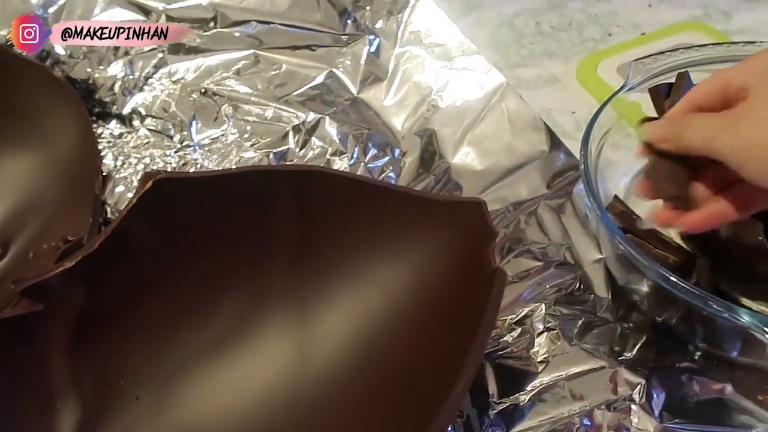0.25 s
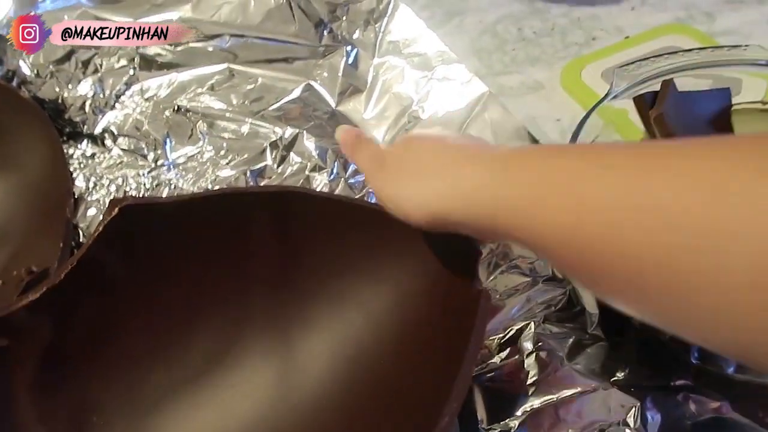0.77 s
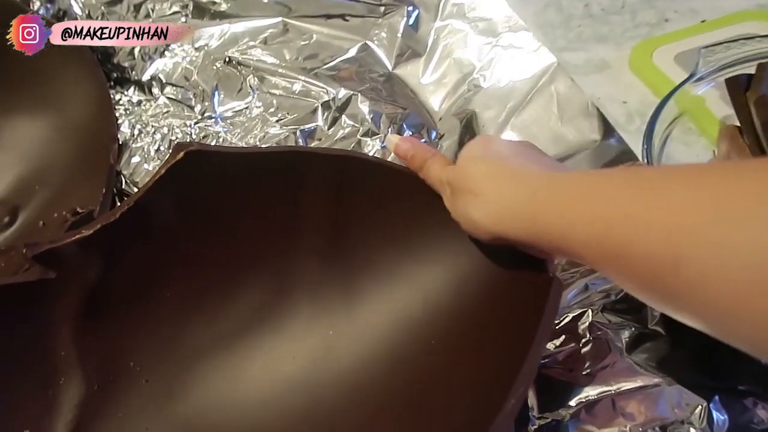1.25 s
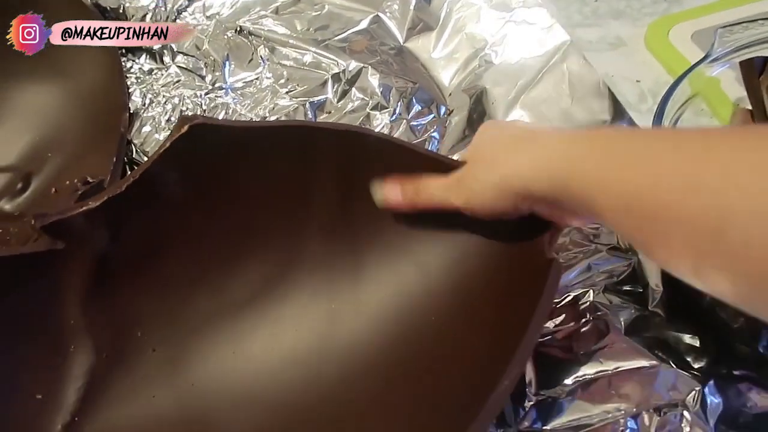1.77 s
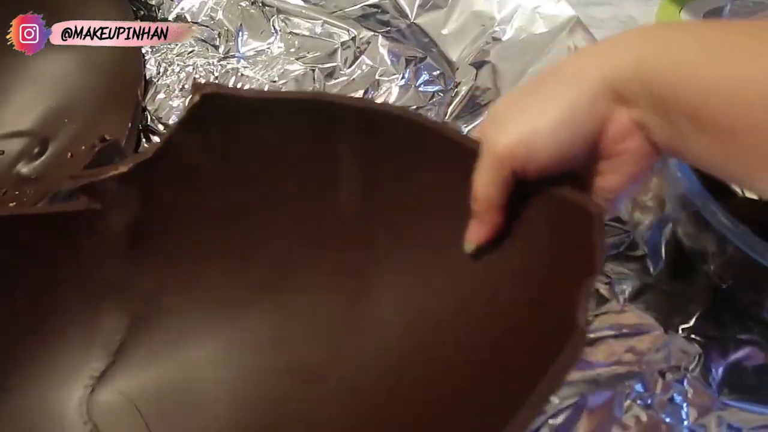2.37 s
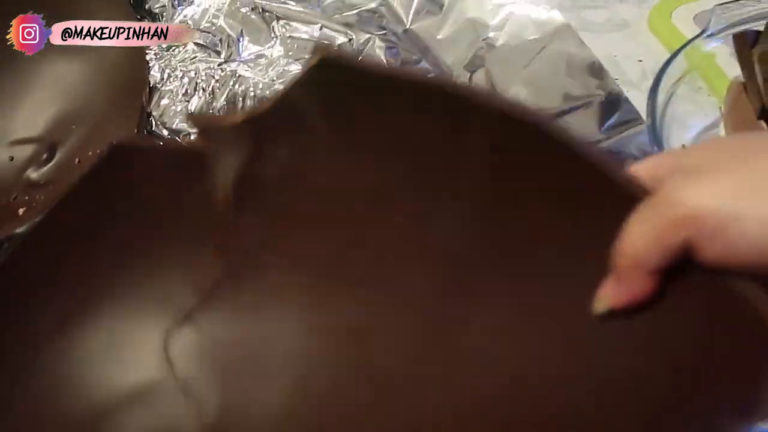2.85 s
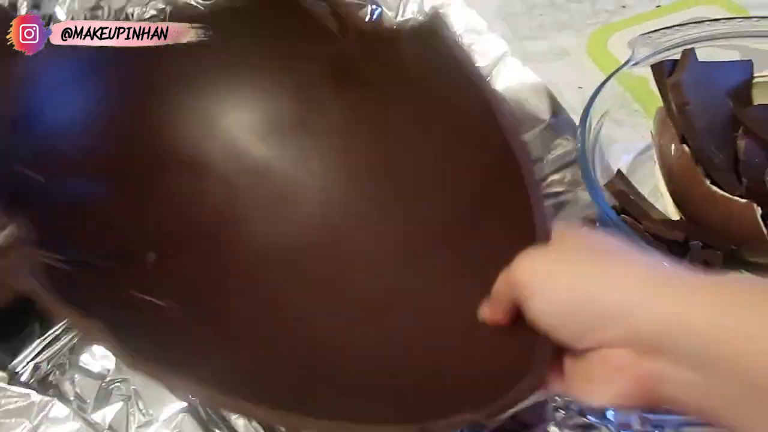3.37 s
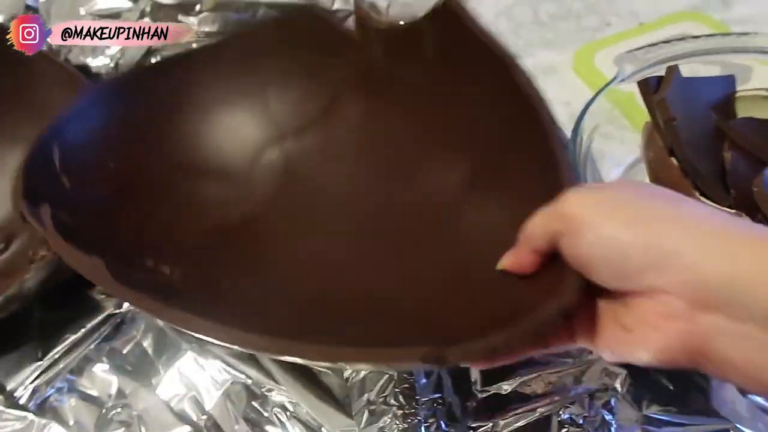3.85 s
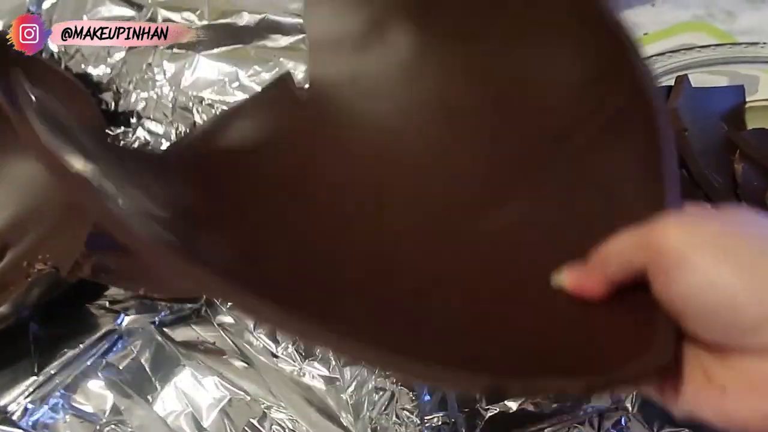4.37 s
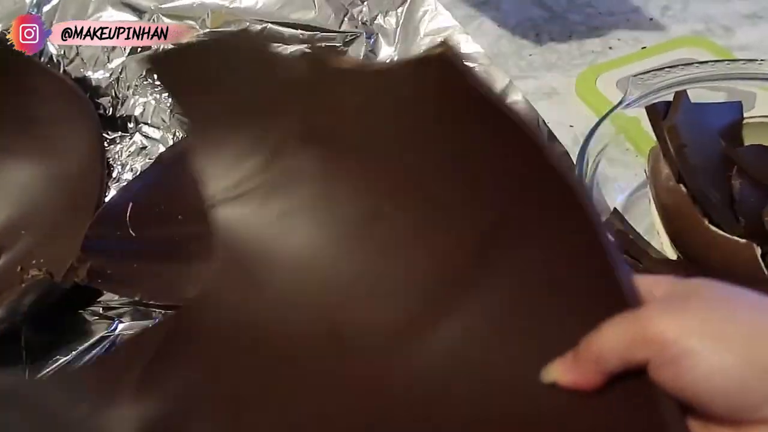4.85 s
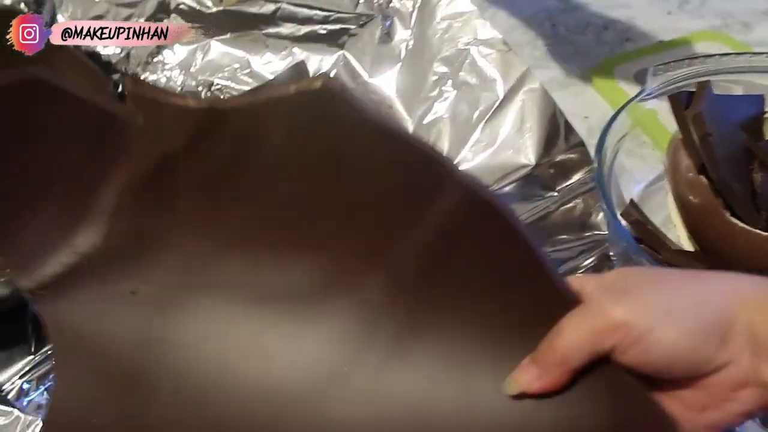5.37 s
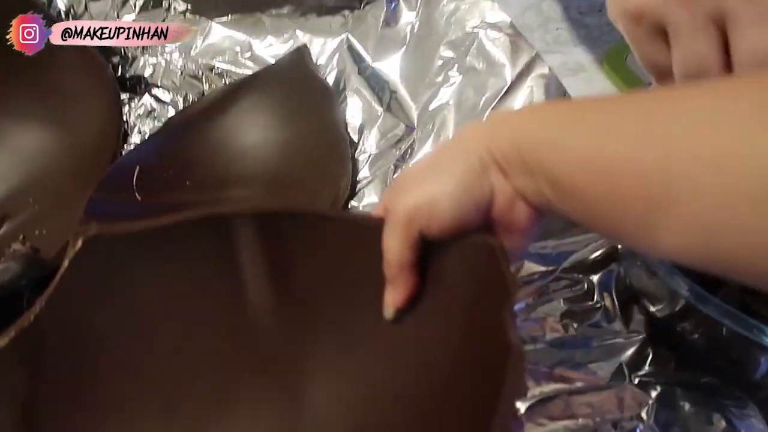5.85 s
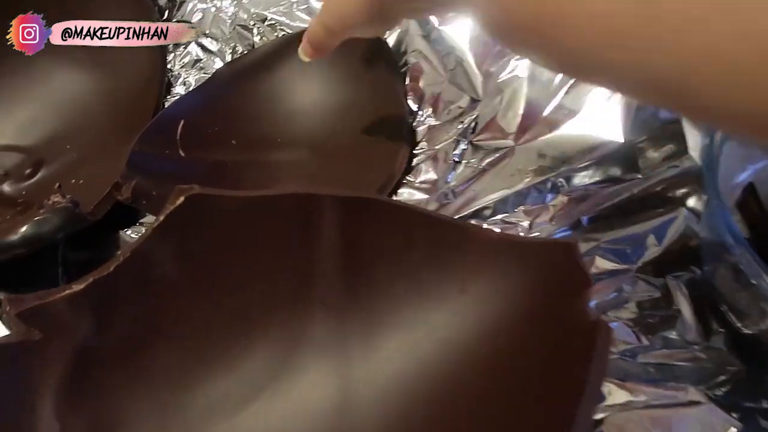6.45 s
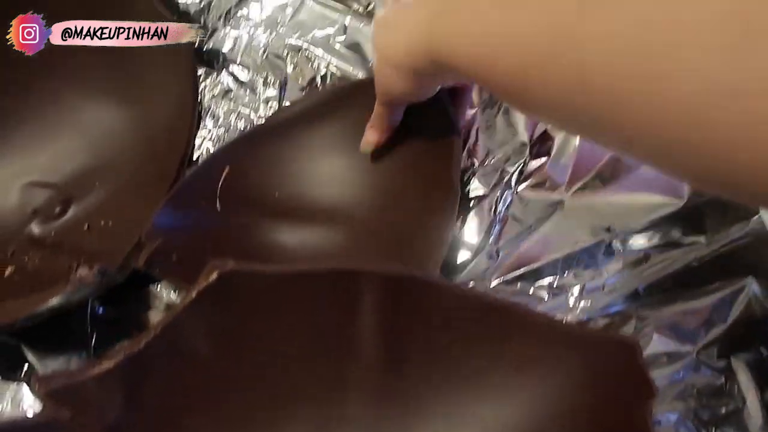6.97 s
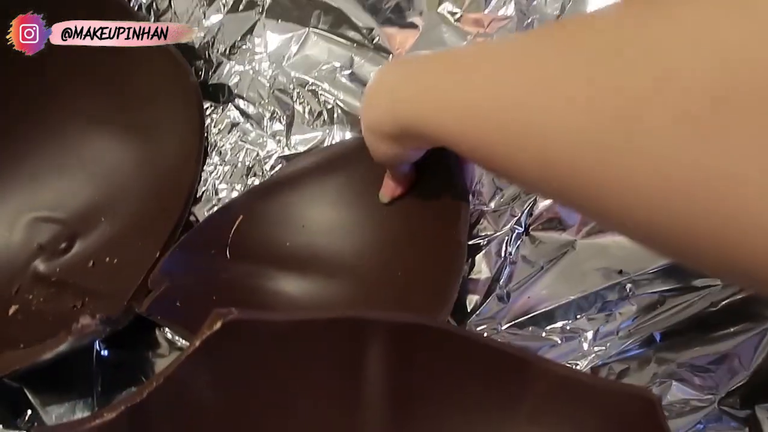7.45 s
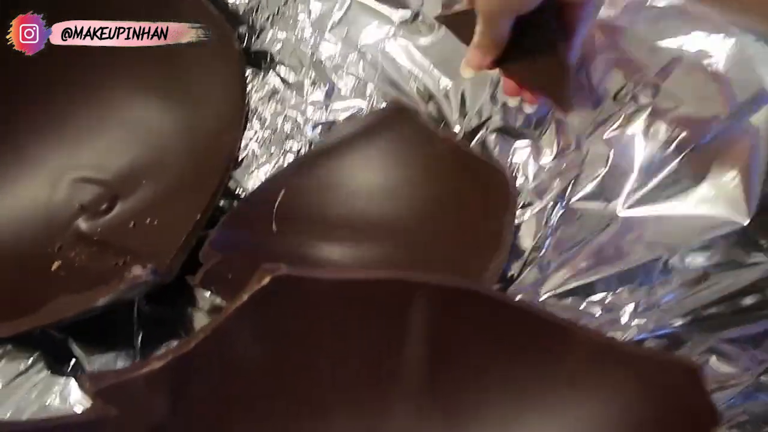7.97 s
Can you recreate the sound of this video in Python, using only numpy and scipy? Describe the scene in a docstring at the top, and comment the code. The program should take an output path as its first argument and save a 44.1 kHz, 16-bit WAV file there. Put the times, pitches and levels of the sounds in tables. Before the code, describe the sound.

Close stereo indoors, with soft low air noise and a faint wavering fan hum throughout. It starts almost quiet, with small ticks and a dull tap at 0.3 seconds and a faint glassy clink at 0.55. Foil begins crinkling around 1.0, a dry crack comes at 1.26 and a very sharp snap at 1.6. From 2.0 to 2.9 foil pops, shell creaks and cracks crowd together over low, lumpy air bumps as the shell is lifted. After a lull, two heavy hollow thuds with snaps land at about 3.5. Quiet rustling leads to a bright hard crack at 4.3, then calmer crinkling. At 5.8 a knock and loud foil burst set the shell down; small pops scatter through 6.0 to 6.8. A loose piece rocks and rustles from 7.0 to 7.5, then a strong crackling burst with a snap and knock at 7.75 fades into light crinkles.

```python
"""Crumpled foil crackles in thousands of tiny creases as hands move a large chocolate shell over it on a table.
The shell creaks as it is rubbed and cracks in short bursts; dull knocks and low air bumps are short swelling sines.
A glass dish is touched and rings as decaying sines, and lifting the shell pushes lumpy low noise at the microphone.
Behind lie a feedback-delay room, coloured air noise and the wavering sines of a fan.
Two microphone ports a finger apart listen from close by."""
import sys
import numpy as np
from scipy import signal
from scipy.fft import rfft, irfft, next_fast_len
from scipy.io import wavfile
from scipy.ndimage import uniform_filter1d, map_coordinates

SR = 44100
rng = np.random.default_rng(int(sys.argv[2]) if len(sys.argv) > 2 else 0)


def store_pcm(level_fs):
    """Save levels as 16-bit WAV."""
    pcm = np.round(np.clip(level_fs, -1, 1) * 32767).astype(np.int16)
    wavfile.write(sys.argv[1], SR, np.atleast_2d(pcm).T)


N = 361619
SECONDS = np.arange(N) / SR
SIDE = np.array([[1], [-1]])   # left port, right port


def from_db(db):
    """Decibels to gain."""
    return 10 ** (np.asarray(db) / 20)


def rms_one(x):
    """Scales to rms 1."""
    return x / np.sqrt(np.mean(x ** 2) + 1e-20)


def at_hz(points, hz):
    """Reads a spectrum on a log-frequency axis."""
    points = np.array(points)
    return np.interp(np.log(hz), np.log(points[:, 0]), points[:, 1])


def drift(rate_hz):
    """Slow chance wandering of rms 1: noise through a double low-pass, drawn at every 20th sample."""
    r = np.exp(-40 * np.pi * rate_hz / SR)
    noise = rng.standard_normal(N // 20 + 4002)
    slow = signal.lfilter([1], [1, -2 * r, r * r], noise)[4000:]   # skip the filter's start
    return np.interp(np.arange(N) / 20, np.arange(len(slow)), rms_one(slow))


def ring(x, hz, t60):
    """A resonance: a unit click starts a sine of height 1 that falls 60 dB in t60 seconds."""
    r, w = from_db(-60 / (t60 * SR)), 2 * np.pi * hz / SR
    return signal.lfilter([0, np.sin(w)], [1, -2 * r * np.cos(w), r * r], x + 1e-18)


def colour(x, spectrum):
    """Filters each row of x by a spectrum in dB."""
    size = next_fast_len(N)
    hz = np.maximum(np.arange(size // 2 + 1) * SR / size, 1)
    return irfft(rfft(x, size) * from_db(at_hz(spectrum, hz)), size)[..., :N]


def passed(x, order, hz, kind):
    """Butterworth filter along time."""
    return signal.sosfilt(signal.butter(order, hz, kind, fs=SR, output="sos"), x)


def two_ports(x, lag_us):
    """A place on the table reaches the left port lag_us later than the right."""
    half = lag_us * SR / 10 ** 6 / 2   # samples
    return np.array([map_coordinates(x, [np.arange(N) - way * half], order=5, mode="nearest")
                     for way in (1, -1)])


# Each move of the hands over the table swells to a peak and dies away. Each row: peak in seconds,
# foil crackle in dB, shell rubbing in dB before a 1 dB cut, swell and fade in seconds per 20 dB.
HAND_MOVES = [(0.0, -51.5, -59, .1, 0.2), (0.355, -58, -49, 0.13, 0.25), (0.563, -68, -38, 0.023, 0.15),
              (1.088, -45, -60, 0.11, 0.16), (1.269, -42, -36, 0.087, 0.17), (1.58, -37.5, -39, 0.52, 0.64),
              (1.618, -32, -32, 0.033, 0.084), (1.856, -45.5, -43, 0.74, 0.19),
              (2.094, -39.5, -35.5, 0.017, 0.4), (2.18, -38, -36.5, 0.25, 0.25),
              (2.38, -42.5, -42.5, 0.016, 0.65), (2.559, -37, -32.5, 0.052, 0.047),
              (2.646, -32, -27, 0.11, 0.61), (2.82, -40, -36, 0.088, 0.27),
              (2.912, -38.5, -36.5, 0.22, 0.33), (3.437, -37, -29.5, 0.0031, 0.59),
              (3.509, -25.5, -18.5, 0.058, 0.14), (3.66, -40.5, -35, 0.25, 0.81),
              (3.949, -37.5, -39.5, 0.4, 0.28), (4.22, -51, -47, 1, 0.024),
              (4.264, -34.5, -28, 0.012, 0.21), (4.296, -25.5, -21, 0.041, 0.15),
              (4.43, -39, -34.5, 0.22, 0.62), (4.995, -49, -47, 0.14, 0.3), (5.214, -41, -40, 0.089, 1),
              (5.458, -42, -58, 0.037, 0.11), (5.662, -41.5, -74, 0.02, 0.078),
              (5.775, -50, -27.5, 0.015, 0.47), (5.889, -27.5, -24, 0.14, 0.14),
              (6.263, -32.5, -33.5, 0.61, 0.22), (6.707, -37, -29.5, 0.016, 0.095),
              (6.754, -36.5, -29.5, 0.062, 0.2), (6.968, -40, -38.5, 0.24, 0.27),
              (7.019, -39.5, -37, 0.095, 0.42), (7.16, -40.5, -37, 0.017, 0.35),
              (7.449, -41.5, -43.5, 0.72, 1), (7.735, -29.5, -30.5, 0.024, 0.17),
              (7.779, -25, -24.5, 0.057, 0.15), (7.97, -32.5, -30.5, 0.24, 0.28),
              (8.1, -38, -40, 0.025, 0.19)]


def handling(column, rest_db):
    """Level in dB of one column of the moves: each runs evenly in dB, powers add to the rest level."""
    t, power = np.arange(0, N + 40, 40) / SR, from_db(2 * rest_db)
    for s, *levels_db, swell_s, fade_s in HAND_MOVES:
        loss_db = 20 * np.where(t < s, (s - t) / swell_s, (t - s) / fade_s)
        power = power + from_db(2 * (levels_db[column] - np.minimum(loss_db, 100)))
    return np.interp(SECONDS, t, 10 * np.log10(power))


def busy(level_db):
    """0 while things lie still, 1 while they are handled."""
    return np.clip((level_db + 58.5) / 11.0, 0, 1)


# Slow change of the foil's treble. Each row: time in seconds, added treble in dB.
TREBLE_DRIFT = [(0, 12), (1.6, -2.5), (2.3, 5.5), (2.9, -0.5), (3.8, 1), (4.5, 3), (5.3, -1.5), (6.2, -4.5),
                (6.75, 8), (7.2, 4), (7.5, -2), (8.2, 2)]
BRIGHT_DB, BRIGHT_FOLLOWS, BRIGHT_MAX_DB = 3, 0.71, 8.5   # at -43.5 dB crackle, dB per dB, limit


def foil_brightness(level_db):
    """The foil's treble in dB rises with the crackle up to a limit, then the slow change is added."""
    following = np.minimum(BRIGHT_DB + BRIGHT_FOLLOWS * (level_db + 43.5), BRIGHT_MAX_DB)
    return following + np.interp(SECONDS, *np.transpose(TREBLE_DRIFT))


HISS_SHARE = 0.6   # power of the fine hiss for each click per second
CLUMPS_PER_S, CLUMP_FADE_S, CLUMP_DB = 38, 0.011, 12   # most clumps, decay by e, gain of the strongest kick


def grains(per_s, spread_db, folding, count):
    """Random uneven clicks over a fine hiss, in clumps that start at once and fade, dealt to count places."""
    sizes = from_db(spread_db * np.minimum(rng.exponential(1, N), 3.1)) * rng.choice([-1, 1], N)
    sizes = sizes / np.sqrt(uniform_filter1d(sizes ** 2, size=2000))
    born = rng.random(N) < per_s / SR
    dealt = rng.integers(0, count, N) == np.arange(count)[:, None]
    hiss = rng.standard_normal((count, N)) * np.sqrt(HISS_SHARE * per_s / SR / count)
    # a fold gives way and a flurry of creases dies down after it; neighbouring places share it
    chance = folding * 2 * CLUMPS_PER_S / (count + 1) / SR
    folds = rng.random((count // 2 + 1, N)) < chance
    kicks = folds * from_db(CLUMP_DB) * rng.uniform(0.67, 1.0, N)
    clumps = 1 + signal.lfilter([1], [1, -np.exp(-1 / (CLUMP_FADE_S * SR))], kicks + 1e-18)
    return clumps[np.arange(count) // 2] * (sizes * born * dealt + hiss)


# Tone of the crumpled foil close by. Each row: frequency in Hz, relative level in dB.
FOIL_TONE = [(290, -64), (500, -6), (748, -13), (1140, -6.5), (1470, -6.5), (2110, -6.5), (2810, -9.5),
             (6560, -14.5), (12200, -16.5), (15600, -26)]
CREASES_PER_S, CREASE_SPREAD_DB = 1100, 4.5   # at -40 dB crackle; widest spread, when handled
SETTLE_DB_PER_S = 92   # foil let go this fast only whispers, without loud creases


def foil(level_db, bright_db):
    """Creases flip by the thousand, denser under a heavy hand, and ring a few cycles; gives four patches."""
    per_s = CREASES_PER_S * np.clip(from_db(0.66 * (level_db + 40)), .7, 6)
    stirred = np.clip(1 + np.gradient(level_db) * SR / SETTLE_DB_PER_S, 0, 1)
    active = stirred * busy(level_db)
    folding = active * np.clip((-26 - level_db) / 12.0, 0, 1)   # loud crackle is less clumped
    creases = grains(per_s, active * CREASE_SPREAD_DB, folding, count=16)
    creases = creases / np.sqrt(per_s / CREASES_PER_S)
    pitches_hz = np.geomspace(900, 12000, 16)[7 * np.arange(16) % 16]   # shuffled over the places
    for k, hz in enumerate(pitches_hz):
        ringing = rms_one(ring(creases[k], hz, 12.7 / hz)) * creases[k].std()
        creases[k] = 0.42 * creases[k] + ringing * (hz / 4000) ** 0.11
    patches = colour(creases.reshape(4, 4, N).sum(0), FOIL_TONE)
    patches /= np.sqrt(np.mean(patches.sum(0) ** 2))
    low = passed(patches, 1, 5000, "low")
    return from_db(level_db) * (low + from_db(bright_db) * (patches - low))


# Resonances of the chocolate shell. Each row: frequency in Hz, broadness in Hz (60 dB decay in
# 1.416 / broadness seconds), level in dB.
SHELL_MODES = [(409, 418, 4.5), (566.5, 104, 0.5), (658, 205, 1.5), (810, 140, 0), (937, 840, 1.5)]


def shell(x):
    """Broad, heavily damped resonances of the chocolate shell, which is too small to radiate bass."""
    rings = sum((-1) ** k * from_db(db) * ring(x, hz, 1.416 / width)
                for k, (hz, width, db) in enumerate(SHELL_MODES))
    return passed(rings, 2, 300, "high")


def rubbing(level_db):
    """Fingers and foil drag over the shell: dense grains excite its resonances and it creaks."""
    return from_db(level_db - 1.0) * rms_one(shell(grains(900, 2.6, folding=0, count=1)[0]))


# The shell cracks or a piece strikes, close to the ports.
# Each row: start in seconds, peak in dB, pitch in Hz, jolt to the shell's body in dB.
SHELL_CRACKS = [(0.327, -40, 780, -27), (0.349, -40, 780, -23), (0.5503, -35, 1890, -32),
                (1.2605, -17.5, 1410, -14.5), (1.6061, -4.5, 1630, -12.5), (2.1563, -19, 2000, -12),
                (2.2672, -15, 3500, -38), (2.377, -19, 2360, -20), (2.6344, -13.5, 1070, -3.5),
                (2.747, -17.5, 1790, -23), (2.8192, -18, 3000, -14), (2.8774, -22, 1526, -12),
                (2.9063, -12, 1060, -12), (3.436, -38, 1020, -31), (3.4585, -19, 1900, -1.5),
                (3.5155, -8.5, 1440, -10), (4.2617, -34, 1570, -12), (4.3294, -16, 1020, -25),
                (5.2555, -26, 2000, -15.5), (6.3385, -17.5, 1090, -14.5), (7.0259, -11.5, 1160, -24),
                (7.1546, -24, 1130, -20), (7.711, -30, 1170, -24), (7.7807, -9.5, 1100, -11)]
# A stiff fold of foil pops. Each row: start in seconds, peak in dB, pitch in Hz.
FOIL_POPS = [(1.066, -33, 1620), (1.3818, -29, 2200), (1.406, -21, 3670), (1.5376, -21, 5500),
             (1.9197, -28.5, 2510), (2.027, -23, 3450), (2.0963, -14.5, 2050), (2.1939, -17, 4000),
             (2.2546, -12.5, 5500), (2.4073, -21, 3400), (2.4509, -21, 2820), (2.5271, -19, 3780),
             (2.611, -17.5, 2020), (2.635, -10, 3000), (2.798, -23, 980), (2.8494, -17, 3600),
             (4.2837, -6.5, 1050), (4.43, -21, 1480), (4.982, -21, 2800), (5.202, -19.5, 1730),
             (5.3038, -29, 4000), (5.435, -28, 4800), (5.651, -21, 4630), (5.8289, -8, 2470),
             (6.02, -20, 1450), (6.0362, -18, 2480), (6.071, -27, 6920), (6.093, -21.5, 1660),
             (6.127, -28, 2500), (6.237, -24, 6700), (6.251, -20, 1300), (6.259, -19, 2200),
             (6.3896, -22.5, 2600), (6.452, -22, 1980), (6.479, -27, 3000), (6.698, -19.5, 1070),
             (6.7102, -15.5, 1770), (6.7445, -17, 2300), (6.8386, -18.5, 3200), (6.963, -25, 2650),
             (7.0175, -17, 2170), (7.0544, -22, 2100), (7.105, -20.5, 2420), (7.268, -25, 3500),
             (7.361, -28, 2120), (7.3662, -14.5, 5460), (7.9418, -18, 1150), (8.097, -31, 1110),
             (8.104, -21, 3070)]
POP_JOLT_DB = -33   # how little of a pop reaches the shell


def cracks():
    """A crack or pop runs for a few milliseconds with one hard click, rings at its pitch and jolts the shell."""
    out, jolts, t = np.zeros(N), np.zeros(N), np.arange(2500) / SR
    run = t / 0.0014 * np.exp(1 - t / 0.0012) + 0.06 * np.exp(-t / 0.02)
    snaps = list(SHELL_CRACKS) + [(s, db, hz, db + POP_JOLT_DB) for s, db, hz in FOIL_POPS]
    bursts = rng.standard_normal((len(snaps), len(t))) * run
    bursts[:, 60] += 14.0   # the hard click, 1.4 ms in
    for k, (s, peak_db, hz, body_db) in enumerate(snaps):
        wide = passed(bursts[k], 2, [0.9 * hz, min(2.83 * hz, 13000)], "band")
        snap = rms_one(ring(wide, hz, 3.7 / hz)) + 1.1 * rms_one(wide)
        i = round(s * SR)
        out[i:i + len(t)] += (from_db(peak_db) * snap / np.abs(snap).max())[:N - i]
        jolts[i + 20] += from_db(body_db)
    return out + shell(jolts)


# Dull knocks on the table, and low bumps of air at the ports between 2.19 and 2.75 s.
# Each row: start in seconds, level in dB, pitch in Hz, ring of the table modes in dB relative to that level.
KNOCKS_AND_BUMPS = [(0.328, -31, 318, -12.5), (2.195, -23, 60, -30), (2.304, -21, 124, -23),
                    (2.352, -23, 70, -30), (2.381, -21, 142, -13), (2.44, -22.5, 68, -30),
                    (2.48, -26, 72, -30), (2.53, -26, 100, -25), (2.633, -22, 695, -18),
                    (2.744, -25, 110, -26), (2.795, -21.5, 574, -14.5), (3.4584, -1.5, 500, -29),
                    (3.5183, -1.5, 398, -35), (3.522, -15, 105, 0.5), (3.552, -15, 135, -30),
                    (4.137, -19, 277, -19.5), (4.149, -24, 246, -29), (4.285, -22.5, 668, -7),
                    (4.598, -32, 48.4, -32), (5.203, -22.5, 315, -21), (5.774, -18.5, 229, -21),
                    (5.787, -18, 423, -18), (5.811, -18, 110, -17.5), (6.713, -19.5, 246, -17),
                    (7.761, -22.5, 313, -16), (7.785, -17, 260, -29)]
# Resonances of the table top. Each row: frequency in Hz, level in dB, 60 dB decay in seconds.
TABLE_MODES = [(92.8, -6.5, 0.68), (117, 2, 0.27), (135, -2.5, 0.97), (161.2, -5.5, 1), (197.3, -11, 0.53),
               (430, -16, 0.3), (530, -8, 0.29)]


def knocks_and_bumps():
    """A knock or air bump swells for a swing or two at its pitch and feeds the table modes; both ports."""
    thuds, pushes, t = np.zeros(N), np.zeros(N), np.arange(4000) / SR
    for s, level_db, hz, ring_db in KNOCKS_AND_BUMPS:
        i = round(s * SR)
        swell = 1.69 * hz * t * np.exp(1 - 2.02 * hz * t)
        thuds[i:i + len(t)] -= from_db(level_db) * np.sin(2 * np.pi * hz * t) * swell
        pushes[i] -= from_db(level_db + ring_db)
    rings = sum(from_db(db) * ring(pushes, hz, t60) for hz, db, t60 in TABLE_MODES)
    return from_db(-0.3 * SIDE) * thuds + rings   # the swells lie slightly to the right


# A loose piece rocked on the foil. The one row: start in seconds, end in seconds, pitch in Hz,
# 60 dB decay in seconds, level in dB relative to the foil under it.
LOOSE_PIECE = (7, 7.5, 2150, .004, -11)


def piece(rustle):
    """The loose piece resonates with the foil under it while it is rocked."""
    start, end, hz, t60, db = LOOSE_PIECE
    progress = np.clip((SECONDS - start) / (end - start), 0, 1)
    held = rustle * np.sqrt(np.sin(np.pi * progress) + 1e-12)
    return from_db(db) * rms_one(np.gradient(ring(held, hz, t60))) * np.std(held)


# A piece touches the glass dish. Each row: start in seconds, strength of the touch in dB.
DISH_TOUCHES = [(.551, -28.5), (.5705, -37)]
# Resonances of the dish. Each row: frequency in Hz, level in dB, 60 dB decay in seconds.
DISH_MODES = [(584, -8.5, 0.5), (936, 0, 0.033), (1550, -10.5, 0.2), (2800, -9.5, 0.075)]


def dish():
    """Each touch is a click that rings the glass."""
    taps = np.zeros(N)
    for s, strength_db in DISH_TOUCHES:
        taps[round(s * SR)] = from_db(strength_db)
    return sum(from_db(db) * ring(taps, hz, t60) for hz, db, t60 in DISH_MODES)


# Where the hands work on the table. Each row: time in seconds, how much later the left port hears
# that spot in microseconds, how far the foil spreads (factor on the patch lags).
HAND_SPOTS = [(0, 25, 1.06), (1.6, 28, 0.95), (2.7, 28, 0.93), (3.0, -1, 1.18), (4.3, 10, 0.82),
              (5.0, 43, 1.22), (5.8, -19, 1), (6.7, 12, 0.8), (7.8, 11, 0.82), (8.2, 18, 0.9)]
# Four patches of foil, one value each: how much later the left port hears it, in microseconds
# at a spread of 1.
PATCH_LAGS = [-35, -26.5, 31.5, 37.5]


def at_ports(patches, hands):
    """Small arrival-time differences place the hands and the foil patches between the two ports."""
    s, spot_us, spread = np.transpose(HAND_SPOTS)
    near = two_ports(hands, np.interp(SECONDS, s, spot_us))
    widening = np.interp(SECONDS, s, spread)
    return near + sum(two_ports(x, us * widening) for x, us in zip(patches, PATCH_LAGS))


# Air pushed by the lifted shell buffets the ports.
# Each row: start in seconds, length in seconds, level in dB before the lumps and the lean.
AIR_GUSTS = [(2.162, .42, -37)]
GUST_HZ, GUST_LUMP_DB = 110, 5.5   # dull and lumpy
GUST_OWN, GUST_OWN_HZ = 0.91, 100   # share that is opposite at the ports, above this frequency
GUST_LEAN_DB = -3   # on the left, as much stronger on the right


def gusts():
    """Lumpy low noise under a rounded swell, partly opposite at the ports."""
    swell = sum(from_db(db) * np.abs(np.sin(np.pi * np.clip((SECONDS - s) / length, 0, 1))) ** .5
                for s, length, db in AIR_GUSTS)
    shared, own = passed(rng.standard_normal((2, N)), 2, GUST_HZ, "low")
    own = passed(own, 2, GUST_OWN_HZ, "high")
    lumps = from_db(GUST_LUMP_DB * drift(22.0) + GUST_LEAN_DB * SIDE)
    return swell * lumps * rms_one(shared + GUST_OWN * SIDE * own)


ROOM_T60_S, ROOM_DB, WALL_CUT_HZ = 0.37, -26, 7300   # decay in the bass, level, treble loss per round


def room(x):
    """Eight feedback delays a side, duller on every round."""
    size = next_fast_len(N + SR)
    w = 2j * np.pi * np.arange(size // 2 + 1) * SR / size
    out = np.zeros((2, len(w)), complex)
    for k, lag in enumerate(rng.uniform(0.01, 0.072, 16)):
        loop = from_db(-60 * lag / ROOM_T60_S) * np.exp(-w * lag) / (1 + w / (2 * np.pi * WALL_CUT_HZ))
        out[k % 2] += loop / (1 - loop) * (-1) ** (k // 2)
    thin = w / (w + 2 * np.pi * 600)   # in the bass both ports share the near sound
    return irfft(out * thin * rfft(x, size), size)[:, :N]


# Tone of the still air in the room. Each row: frequency in Hz, relative level in dB.
AIR_TONE = [(18, -50), (30, 1), (126, -0.5), (202, -5), (225, -9), (307, -7), (369, -7.5), (432, -5),
            (639, -16), (945, -20), (1020, -21), (2300, -28.5), (2990, -32.5), (12900, -49.5), (15500, -67)]
# How alike the air sounds at the two ports. Each row: frequency in Hz, left-right likeness
# (1 the same, -1 opposite; held just inside those limits).
PORT_LIKENESS = [(60, 1.1), (200, 1.03), (700, 0.54), (1300, 0.73), (2400, -0.17), (4400, -0.5),
                 (15000, 0.65)]
# Hum of the fan in the room. Each row: frequency in Hz, sine height in dB before a 2 dB lift and the wavering.
FAN_TONES = [(85, -51.5), (252, -56.5), (300, -47.5), (323.5, -51)]
AIR_DB, FAN_LEAD = -42.5, 0.2   # air rms; radians by which the fan's tones differ between the ports


def room_tone():
    """Steady air noise, alike at both ports in the bass, and the fan's wavering sines."""
    mid, side = rng.standard_normal((2, N))
    likeness = [(hz, np.clip(c, -.99, .9999)) for hz, c in PORT_LIKENESS]
    alike = [(hz, 10 * np.log10((1 + c) / 2)) for hz, c in likeness]
    apart = [(hz, 10 * np.log10((1 - c) / 2)) for hz, c in likeness]
    air = rms_one(colour(colour(mid, alike) + colour(side, apart) * SIDE, AIR_TONE))
    tones = 0
    for k, (hz, db) in enumerate(FAN_TONES):
        height = from_db(db + 2.0 + 2.0 * drift(0.42))
        phase = 2 * np.pi * hz * SECONDS + drift(3.8)
        tones = tones + height * np.sin(phase + (-1) ** k * FAN_LEAD / 2 * SIDE)
    return from_db(AIR_DB) * air + tones


FOIL_REST_DB, RUB_REST_DB = -62.5, -48   # while things lie still; rubbing before its 1 dB cut


def scene():
    """All sources near the ports, the room behind them."""
    foil_db = handling(column=0, rest_db=FOIL_REST_DB)
    rub_db = handling(column=1, rest_db=RUB_REST_DB)
    patches = foil(foil_db, foil_brightness(foil_db))
    rustle = patches.sum(0)
    hands = cracks() + rubbing(rub_db) + dish() + piece(rustle)
    near = at_ports(patches, hands) + knocks_and_bumps() + gusts()
    return near + from_db(ROOM_DB) * room(rustle + hands) + room_tone()


MIC_LOW_HZ, CUTOFF_HZ = 51.7, 15800   # bass corner; 60 dB down from here up


def record(dry):
    """The microphone loses the deepest bass and rounds the highest peaks, the top is cut."""
    rounded = 1.2 * np.tanh(passed(dry, 2, MIC_LOW_HZ, "high") / 1.2)
    return signal.sosfilt(signal.cheby2(14, 60, CUTOFF_HZ, fs=SR, output="sos"), rounded)


dry = scene()
out = record(dry)
store_pcm(out)
```